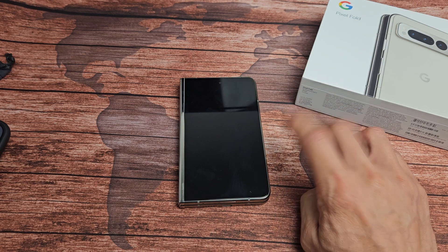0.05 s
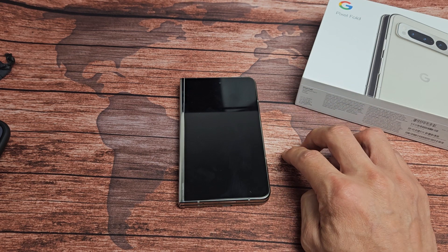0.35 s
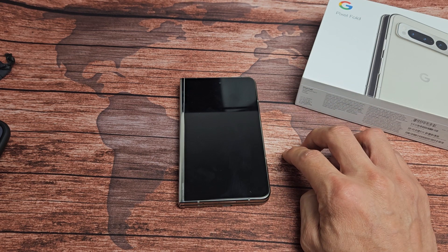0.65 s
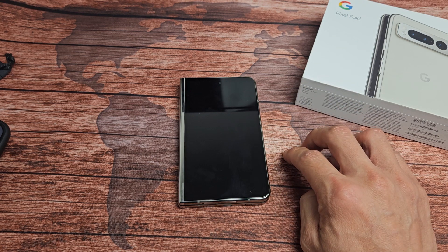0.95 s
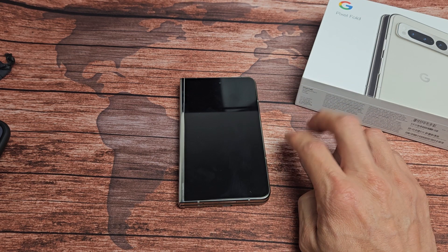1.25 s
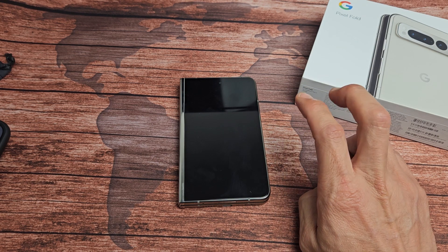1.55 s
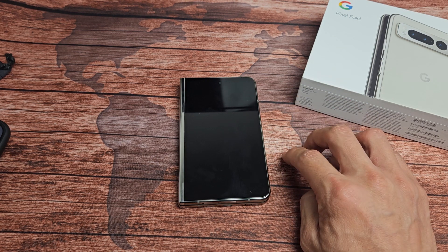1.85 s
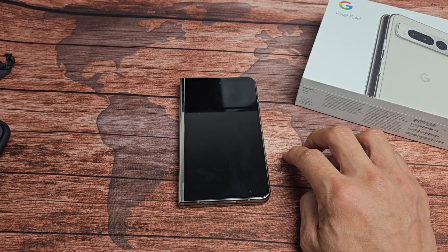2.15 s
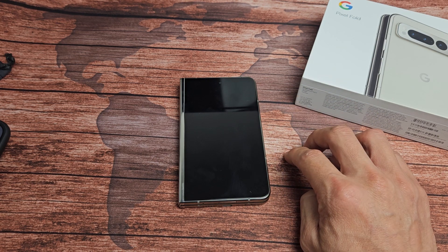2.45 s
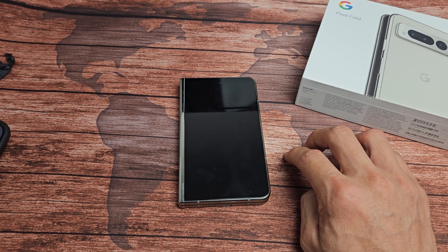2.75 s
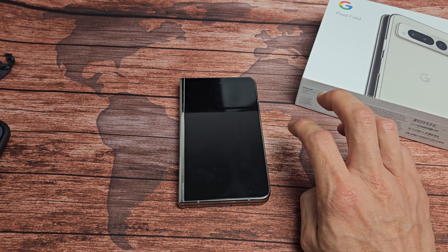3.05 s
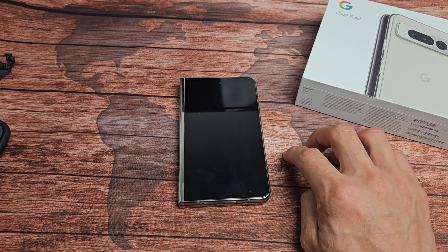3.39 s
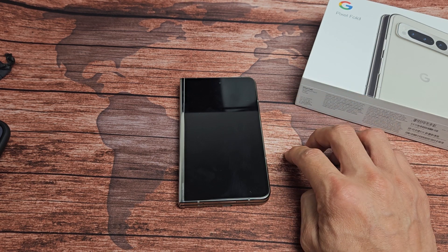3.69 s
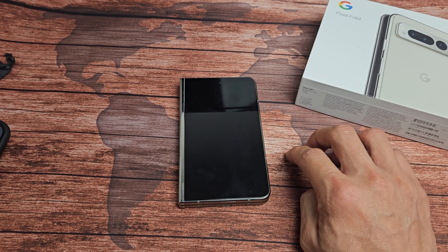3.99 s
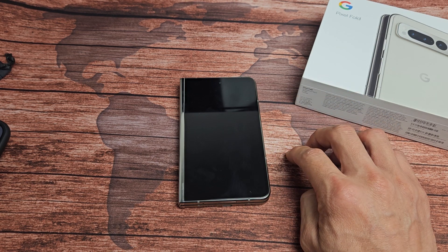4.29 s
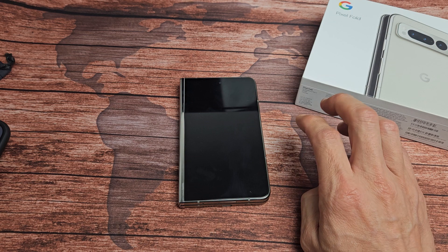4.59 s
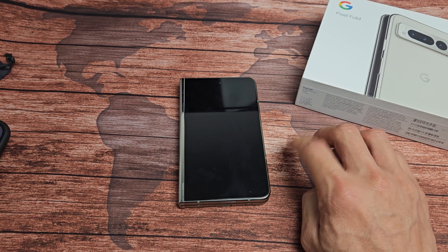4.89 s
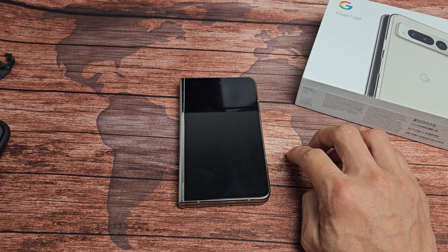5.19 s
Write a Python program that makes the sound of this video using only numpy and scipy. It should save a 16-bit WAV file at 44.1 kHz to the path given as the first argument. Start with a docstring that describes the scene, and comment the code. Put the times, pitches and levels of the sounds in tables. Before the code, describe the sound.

Fingertips tap on a wooden desk in four slow, spaced groups, over a faint low hum in a quiet room.

```python
"""In a small quiet room, over a low rumble and faint hiss, two fingertips drop in turn on a wooden desk.
Each pad sends a bending wave through the top and sets its modes ringing; the nail adds a short click.
A few tiny ticks follow, then two fingers land again at 1.7 s. Halfway a mains hum comes up, and at
3.3 s four fingers roll from little to index. A faint drone swells until 4.2 s and settles; the hum
starts to fade just before the last four-finger roll at 4.8 s."""
import sys
import numpy as np
from scipy import signal
from scipy.fft import rfft, irfft
from scipy.io import wavfile

SR = 44100
rng = np.random.default_rng(int(sys.argv[2]) if len(sys.argv) > 2 else 0)


def transcribe(signal):
    """Save signal, clipped to [-1, 1], as a 16-bit WAV file at the path in sys.argv[1]."""
    frames = np.atleast_2d(signal).T
    limited = np.clip(frames, -1, 1)
    pcm = np.round(limited * 32767).astype(np.int16)
    wavfile.write(sys.argv[1], SR, pcm)


N = 230775
SIZE = 32768   # samples in one short sound
AGE = np.arange(SIZE) / SR
HZ = np.maximum(np.fft.rfftfreq(SIZE, 1 / SR), 1)
SCENE_HZ = np.maximum(np.fft.rfftfreq(N, 1 / SR), 1)

# finger landings: start_s, finger, strength_db, hard_edge_db, nail_ring_hz
LANDINGS = [(0.0908, "middle", 2, 1.5, 2900), (0.113, "index", -4.5, -3.5, 4000),
            (1.7092, "middle", -0.5, -1, 1600), (1.7644, "index", -8.5, 1.5, 4750),
            (3.2837, "little", -24.5, 1, 1780), (3.3046, "ring", -9, -1.5, 2050),
            (3.3362, "middle", -2.5, 0.6, 2800), (3.3694, "index", -14.5, 2.5, 2600),
            (4.8240, "little", -24.5, -0.5, 1700), (4.845, "ring", -10.5, 0, 4600),
            (4.8837, "middle", -8.5, 0.5, 2700), (4.9372, "index", -20.5, 0.5, 2950)]
# each finger's contact at strength 0 dB: pad_cutoff_hz, knock_db, nail_db, nail_cutoff_hz, nail_pan_db
FINGER_CONTACTS = {"little": (2990, 11, -9.5, 4502, -0.5), "ring": (694, -2.5, -20, 6597, 0.5),
                   "middle": (1554.5, -7, -20.5, 7903, 2.5), "index": (1606, 7.5, -11, 11398.5, 2)}
# low bending modes of the desk top: pitch_hz, level_db, t60_s
DESK_MODES = [(97.8, -18.2, .042), (128, -26, .24), (183, -39.6, .19), (236.8, -15, .05),
              (233.8, -21.3, .088), (290, -27.6, .056), (331.5, -18.7, .028), (416.5, -16, .008),
              (586, -18.9, .018), (581, -40, .09), (744, -38, .018)]
# higher modes that only a finger's hard edge reaches: pitch_hz, level_db, t60_s
KNOCK_MODES = [(847, -62.5, 0.069), (997, -48.5, 0.036), (1086, -40.5, 0.021), (1220, -48, 0.062),
               (1336, -50, 0.064), (1500, -51.5, 0.017), (1750, -59, 0.021), (2365, -57, 0.028),
               (3540, -60, 0.018)]
# spectrum of a nail click: frequency_hz, gain_db
NAIL_SPECTRUM = [(500, 0), (1200, 4), (2000, 0), (2900, -1.5), (4500, -3.5), (6000, -8), (8000, -8),
                 (9300, -12), (10000, -17.5), (12000, -14), (16000, -6)]
# tiny ticks: start_s, level_db, centre_hz, width_hz, t60_s, pan_db
TINY_TICKS = [(0.3031, -65, 8000, 1100, 0.01, -8), (0.446, -68, 510, 700, 0.058, 6),
              (0.514, -72, 505, 600, 0.04, 6), (0.585, -72.5, 3400, 900, 0.019, 13),
              (0.8566, -52, 2970, 940, 0.025, -5), (0.88, -65.5, 1370, 300, 0.47, 4.5),
              (0.883, -69.5, 2800, 1790, 0.1, 13), (4.408, -84, 5040, 1200, 0.044, 5)]
# strength of the room's reflections: frequency_hz, gain_db
REFLECTION_SPECTRUM = [(60, -8), (120, -13.5), (250, -14.5), (600, -7.5), (1300, -10.5), (3000, -5),
                       (8000, -7), (16000, -1.5)]
# likeness of the left and right sound fields: frequency_hz, coherence_ratio
COHERENCE = [(40, 1), (250, 0.86), (600, 0.34), (1500, 0), (5000, 0), (16000, 0.6)]
# resonances of the drone: centre_hz, width_hz, level_db
DRONE_RESONANCES = [(85.4, 26, 3.5), (156, 44, -5.5), (192, 30, -10), (237.8, 24, -13.5)]
# rumble of the still room: frequency_hz, relative_density_db
RUMBLE_SPECTRUM = [(12, -36), (20, -6), (37, -1), (54, 1.5), (66, -8), (86, -31), (102, -20.5),
                   (119, -15.5), (134, -23.5), (147, -36.5), (203, -23), (450, -40), (580, -71),
                   (990, -120)]
# hiss of the still room: frequency_hz, relative_density_db
HISS_SPECTRUM = [(240, -44.5), (400, -12.5), (481, -1.5), (1190, -8), (1430, -8.5), (2110, -16),
                 (2420, -18.5), (3290, -19.5), (3840, -21), (4760, -21), (7550, -30.5), (15800, -31)]


def fingers():
    """Impact excitation: a harder landing is a shorter contact, so thump and nail click are brighter."""
    out = np.zeros((2, N))
    for start_s, finger, db, edge_db, ring_hz in LANDINGS:
        pad_hz, knock_db, nail_db, nail_hz, pan_db = FINGER_CONTACTS[finger]
        brighter = 2 ** (0.0375 * db)   # cut-offs rise 0.0375 octave per dB
        thump = from_db(db) * low_pass(ringing(DESK_MODES, scatter_db=1.27), pad_hz * brighter)
        knock = from_db(db + knock_db + edge_db) * ringing(KNOCK_MODES, scatter_db=3.0)
        add(out, start_s, bending_wave(panned(thump, db=1.2) + knock, travel_s=0.001405))
        nail = from_db(db + nail_db + 0.6 * edge_db) * nail_click(nail_hz * brighter, ring_hz)
        add(out, start_s, panned(nail, pan_db))
    return out


def ringing(modes, scatter_db):
    """Modal superposition: damped sines, neighbours opposite in sign, their levels varying by strike."""
    offsets_db = scatter_db * rng.standard_normal(len(modes))
    return sum(-(-1) ** k * from_db(db + offsets_db[k]) * np.sin(2 * np.pi * hz * AGE) * dying(t60)
               for k, (hz, db, t60) in enumerate(modes))


def bending_wave(x, travel_s):
    """Dispersion: the group delay, travel_s at 500 Hz, falls with the square root of frequency."""
    turns = 2 * travel_s * np.sqrt(500 * HZ)
    return irfft(rfft(x) * np.exp(-2j * np.pi * turns))


def nail_click(cutoff_hz, ring_hz, ring_width_hz=290, ring_db=5.5, grit=2.7, spread=0.6):
    """Impulse and resonance: sharp contact, then grit as the nail presses the grain, ring the nail."""
    common, side = rng.standard_normal((2, SIZE)) * dying(t60_s=0.012)
    click = grit * (common + spread * side * [[1], [-1]]) / np.linalg.norm(common)
    click[:, 0] -= 1   # the first contact
    ring = signal.lfilter(*signal.iirpeak(ring_hz, ring_hz / ring_width_hz, fs=SR), click)
    nail = (click + from_db(ring_db) * ring) / np.sqrt(1 + grit ** 2)
    return low_pass(coloured(nail, NAIL_SPECTRUM), cutoff_hz)


def ticks():
    """Damped transients: each tiny tick is a band of noise that decays exponentially."""
    out = np.zeros((2, N))
    for start_s, db, hz, width_hz, t60_s, pan_db in TINY_TICKS:
        band = signal.butter(2, [hz - width_hz / 2, hz + width_hz / 2], "band", fs=SR, output="sos")
        noise = unit_rms(signal.sosfilt(band, rng.standard_normal(SIZE)))
        add(out, start_s, panned(from_db(db) * noise * dying(t60_s), pan_db))
    return out


def room(x, build_s=0.0055, t60_at_1khz_s=0.2):
    """Reverberation: dense reflections build up within a few ms and die faster in the treble."""
    noise, tail = stereo_noise(HZ, SIZE), 0
    build_up = 1 - np.exp(-(AGE / build_s) ** 2)
    edges_hz = np.geomspace(40, 18000, 15)
    for low, high in zip(edges_hz, edges_hz[1:]):
        hz = np.sqrt(low * high)
        envelope = build_up * dying(t60_at_1khz_s * (hz / 1000) ** -0.25)
        band = irfft(noise * ((HZ >= low) & (HZ < high)))
        tail += from_db(at_hz(REFLECTION_SPECTRUM, hz)) * band * envelope / np.linalg.norm(envelope)
    return signal.fftconvolve(x, tail, axes=1)[:, :N]


def mains_hum(t, pitch_hz=119.3, idle_db=-73.5, on_db=-58, fade_s=4.7, fade_db_per_s=9.5):
    """Amplitude modulation: a tone and its weak octave waver as they come up, hold and fade."""
    level_db = np.interp(t, [2.37, 2.64], [idle_db, on_db])
    level_db -= fade_db_per_s * np.maximum(t - fade_s, 0)
    waver_db = resonant_noise(hz=2.0, width_hz=4.2)[0]
    phase = 2 * np.pi * pitch_hz * t
    tone = np.sqrt(2) * (np.sin(phase) + from_db(-22.5) * np.sin(2 * phase))
    return from_db(level_db + waver_db) * tone


def drone(t, peak_s=4.183, rise_s=0.45, settle_s=0.35, idle_db=-77.5, peak_db=-58, settled_db=-64.5):
    """Noise-driven resonances: a distant drone swells once, then relaxes to a lower level."""
    swell_db = np.interp(t, [peak_s - rise_s, peak_s], [idle_db, peak_db])
    settled = 1 - np.exp(-np.maximum(t - peak_s, 0) / settle_s)
    noise = sum(from_db(db) * resonant_noise(hz, width_hz) for hz, width_hz, db in DRONE_RESONANCES)
    return from_db(swell_db + (settled_db - peak_db) * settled) * noise


def air(rumble_db=-53.5, hiss_db=-81):
    """Ambient noise: a rumble in the room's deepest modes, with a very faint hiss."""
    rumble = from_db(rumble_db) * steady_noise(RUMBLE_SPECTRUM)
    hiss = from_db(hiss_db) * steady_noise(HISS_SPECTRUM)
    return rumble + hiss


def resonant_noise(hz, width_hz):
    """Resonance: a bell-shaped response passes one narrow band of noise; unit rms."""
    response = 1 / (1 + (2 * (SCENE_HZ - hz) / width_hz) ** 2)
    return unit_rms(irfft(stereo_noise(SCENE_HZ, N) * response, N))


def steady_noise(spectrum):
    """Spectral shaping: stationary stereo noise of the given colour; unit rms."""
    return unit_rms(irfft(stereo_noise(SCENE_HZ, N) * from_db(at_hz(spectrum, SCENE_HZ)), N))


def stereo_noise(hz, size):
    """Partial coherence: spectra of two white noises, most alike in the bass."""
    mid, side = rfft(rng.standard_normal((2, size)))
    alike = at_hz(COHERENCE, hz)
    return np.sqrt((1 + alike) / 2) * mid + np.sqrt((1 - alike) / 2) * side * [[1], [-1]]


def coloured(x, spectrum):
    """Minimum phase: folding the cepstrum gives a causal filter with the given spectrum."""
    cepstrum = irfft(np.log(from_db(at_hz(spectrum, HZ))))
    cepstrum[1:SIZE // 2] *= 2
    cepstrum[SIZE // 2 + 1:] = 0
    return irfft(rfft(x) * np.exp(rfft(cepstrum)))


def low_pass(x, hz):
    """Second-order roll-off above hz."""
    return signal.sosfilt(signal.butter(2, min(hz, SR / 2 - 1), fs=SR, output="sos"), x)


def dying(t60_s):
    """Exponential decay of 60 dB in t60_s."""
    return np.exp(-np.log(1000) * AGE / t60_s)


def panned(x, db):
    """Level-difference panning: left exceeds right by db."""
    return x * from_db([[db / 2], [-db / 2]])


def add(out, start_s, sound):
    """Superposition: mix a sound in at start_s, its far end faded to nothing."""
    start = int(round(start_s * SR))
    fade = np.clip(2 - 3 * AGE / AGE[-1], 0, 1)
    out[:, start:start + SIZE] += (sound * fade)[:, :N - start]


def at_hz(points, hz):
    """Interpolation on a log-frequency axis."""
    points_hz, values = np.transpose(points)
    return np.interp(np.log(hz), np.log(points_hz), values)


def from_db(db):
    """Decibels to amplitude ratio."""
    return 10 ** (np.asarray(db) / 20)


def unit_rms(x):
    """Normalisation to unit power."""
    return x / np.sqrt(np.mean(x ** 2) + 1e-20)


def scene():
    """Superposition: direct taps and ticks, their reverberation and the background."""
    t = np.arange(N) / SR
    direct = fingers() + ticks()
    background = air() + mains_hum(t) + drone(t)
    return direct + room(direct) + panned(background, db=2.0)


def record(dry):
    """Band limiting: the microphone drops the deepest bass, and the top is cut steeply."""
    bass_cut = signal.butter(1, 15, "high", fs=SR, output="sos")
    treble_cut = signal.ellip(10, .1, 80, 15800, fs=SR, output="sos")
    return signal.sosfilt(treble_cut, signal.sosfilt(bass_cut, dry))


dry = scene()
out = record(dry)
transcribe(out)
```